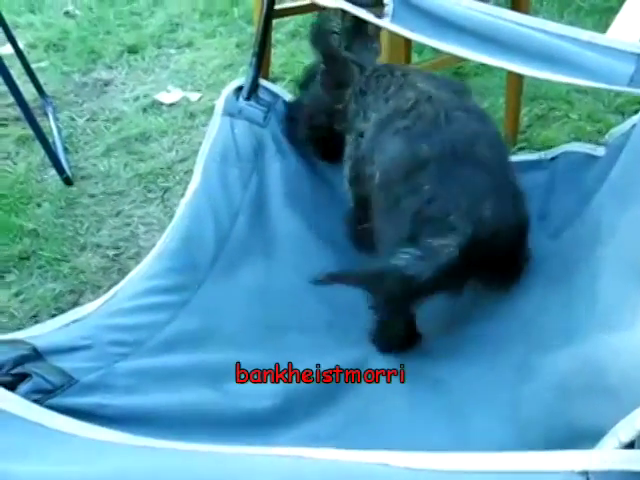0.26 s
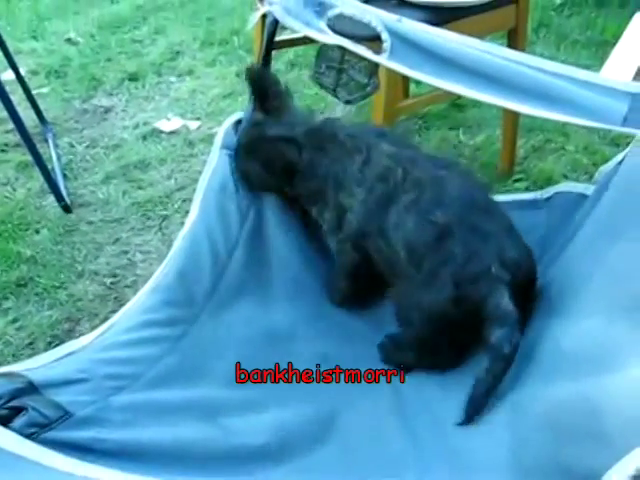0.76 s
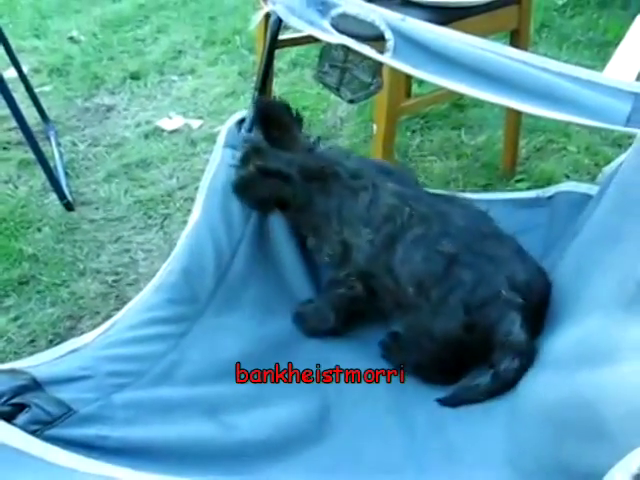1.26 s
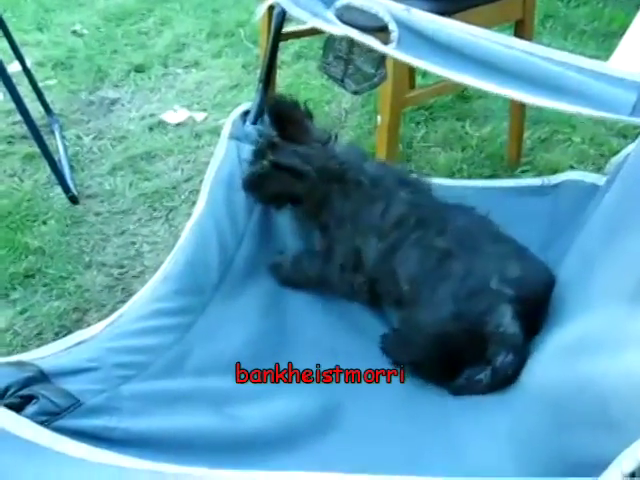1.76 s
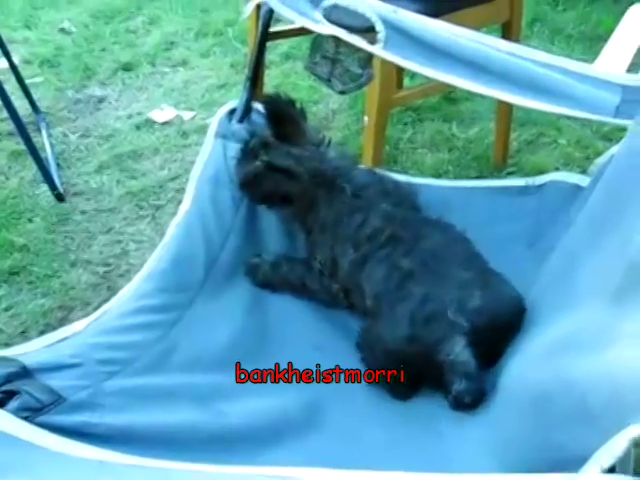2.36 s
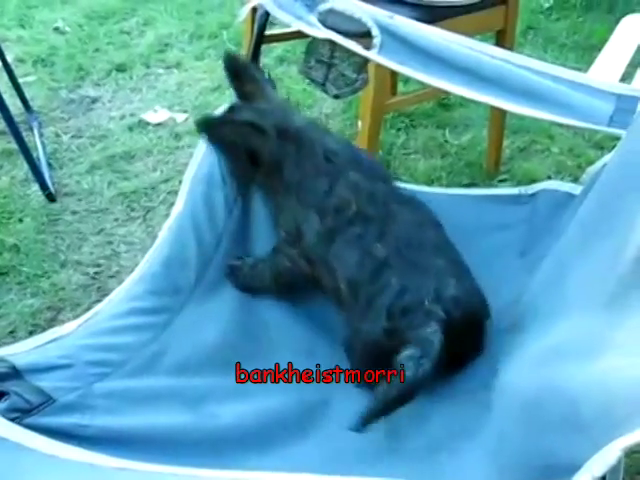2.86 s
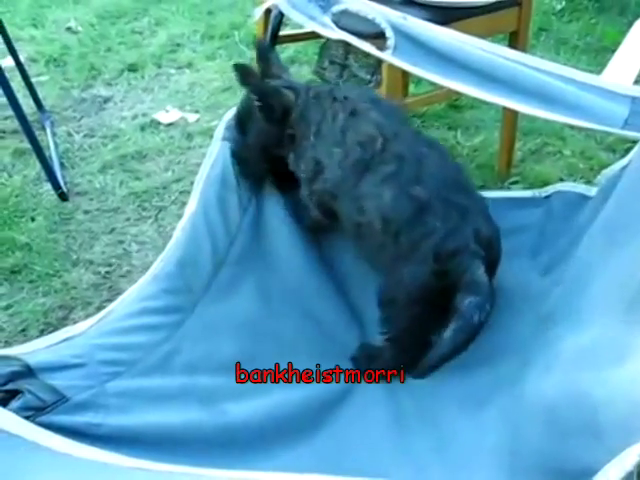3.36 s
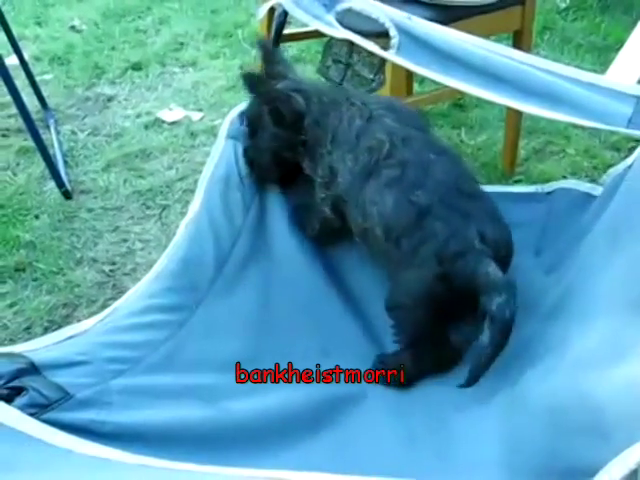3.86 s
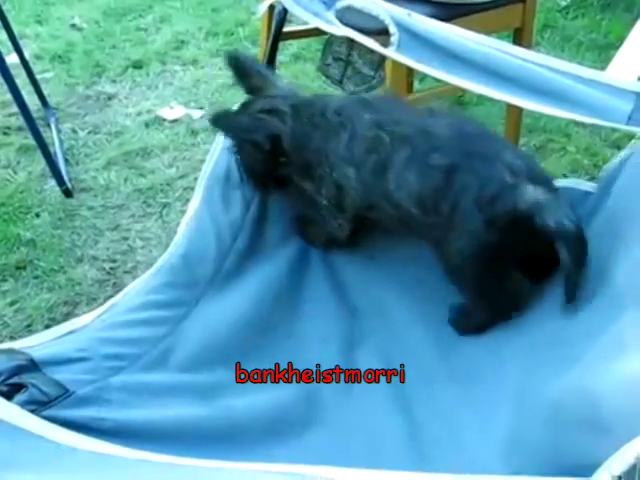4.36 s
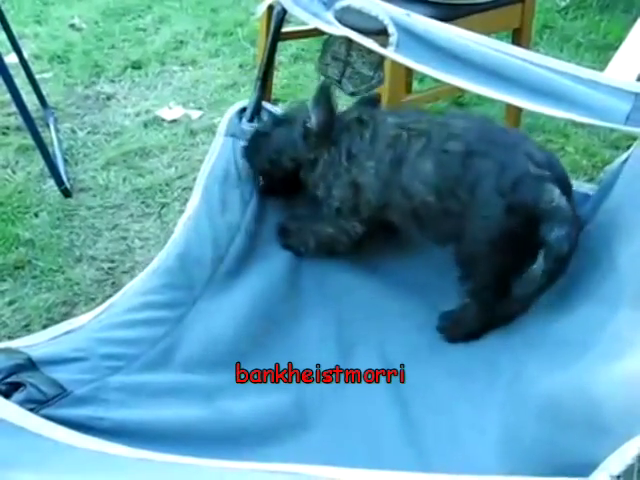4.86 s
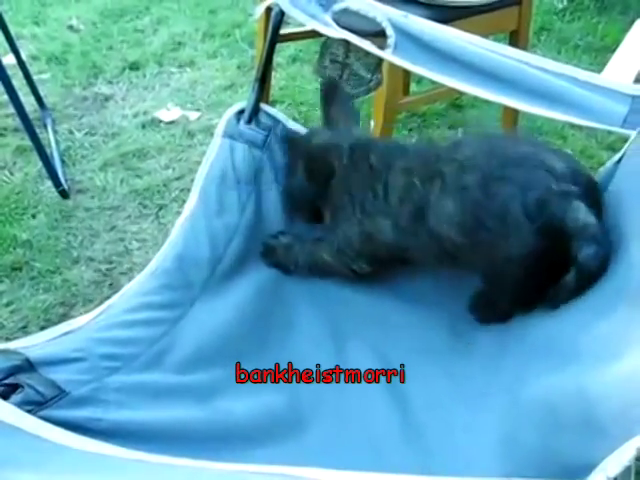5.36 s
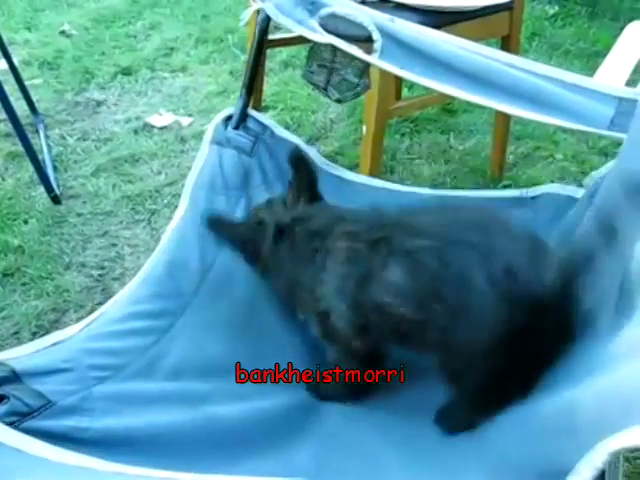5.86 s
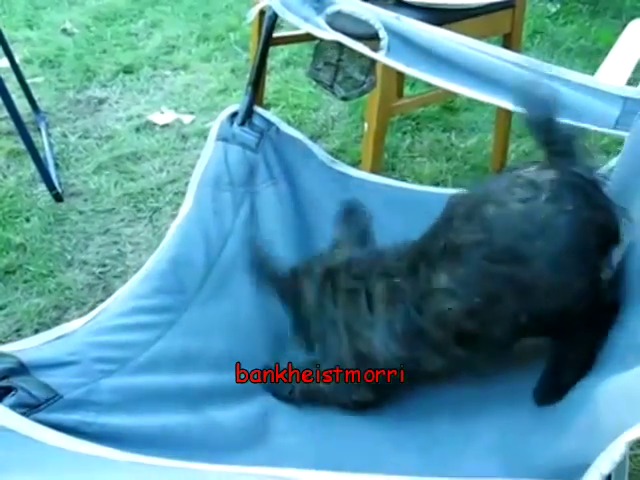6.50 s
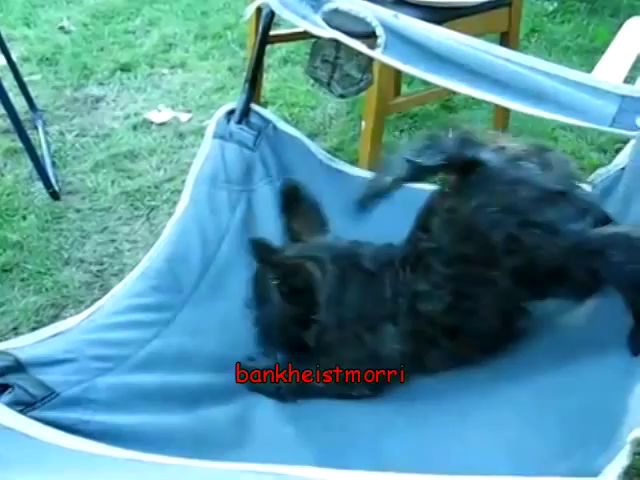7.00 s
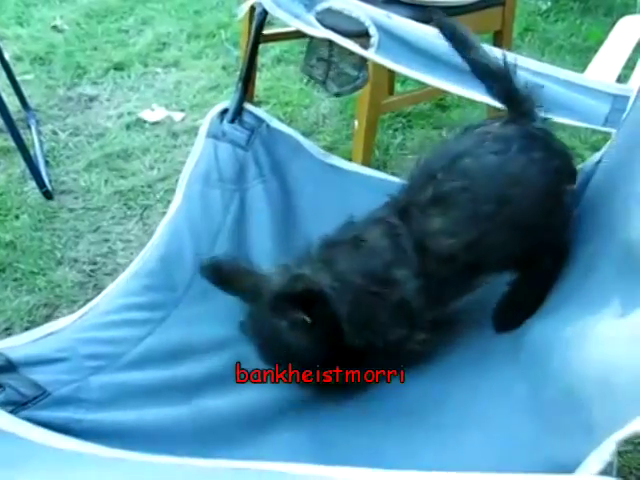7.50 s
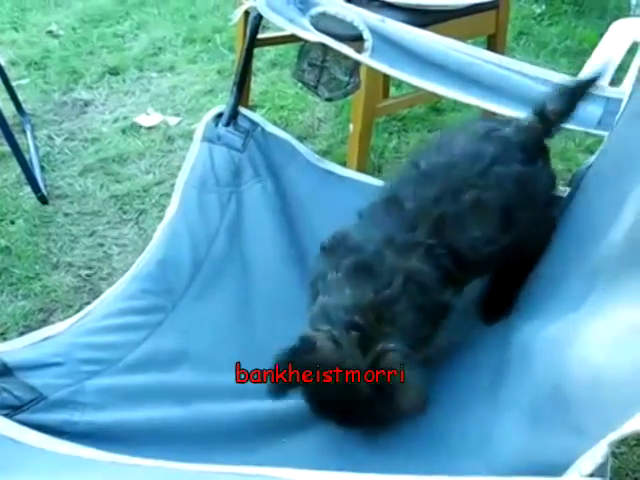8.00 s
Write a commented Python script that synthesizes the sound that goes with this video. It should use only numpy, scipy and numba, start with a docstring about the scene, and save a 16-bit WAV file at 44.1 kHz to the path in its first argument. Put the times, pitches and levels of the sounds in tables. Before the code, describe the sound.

A small dog digs at a taut cloth chair seat, claws scuffing, snagging and plucking in irregular bursts, with short squeaks and brief near-silent gaps.

```python
"""Scuffs, snaps and squeaks, close up: a small dog digs at the cloth seat of a folding chair on a lawn.
Paws drag over the weave in many tiny random slips; claws snag and release as damped plucks; both ring
four seat modes. Claws also skid with a gliding pitch, short squeaks and knocks ring at a steady pitch, fur
hisses as banded noise, hard landings thump the frame, and rumble and an even outdoor hush lie below.
The small camera mutes its input below a threshold and has a dull top, a small offset and hiss."""
import sys
import numpy as np
from scipy import signal
from scipy.io import wavfile
from scipy.ndimage import uniform_filter1d
from numba import njit

SR = 44100
rng = np.random.default_rng(int(sys.argv[2]) if len(sys.argv) > 2 else 0)


def wav_out(sig):
    """Save sig, one row per channel (or a flat mono array), as 16-bit PCM at SR to the path in sys.argv[1]."""
    wavfile.write(sys.argv[1], SR, np.round(np.clip(np.atleast_2d(sig).T, -1, 1) * 32767).astype(np.int16))


N = 363384

# Modes of the stretched seat, widths before scaling: mode_hz, drag_width_hz, free_width_hz
SEAT_MODES = [(298.7, 121, 210), (797.5, 271, 284), (1753, 960, 810), (3260, 1590, 1560)]
# Slips feeding each mode: rate_per_s, scatter_db, flicker_db, pitch_drift_share
MODE_SLIPS = [(505.7, 3.0, 0, 0.11), (1199, 3.5, 1.5, 0.045), (3520, 2, 2.5, 0.18), (11400, 3.5, 1, 0.11)]
# Share of a hard catch reaching each seat mode: share [ratio]
CATCH_SHARE_PER_MODE = [.45, 0.59, 0.72, 0.42]
# How readily each seat mode speaks under a paw: level_db
PAW_MODE_DB = [0.0099, 0.25, -1.23, -0.045]
# How readily each seat mode speaks in a snag or tick: level_db
SNAG_TICK_MODE_DB = [0.99, 2.5, 2.4, 3.44]
# Paw strokes over the weave: peak_s, swell_s, fade_s, level_db,
# strongest_oct (octaves above the lowest mode), falloff_db_per_oct
PAW_STROKES = [(.047, 0.027, 0.033, -38.5, 5, 2.5), (.142, 0.034, 0.043, -31, 1.5, 2.5),
               (.205, 0.021, 0.033, -37, 2, 1), (.352, 0.062, 0.053, -27, 1.5, 5.5),
               (.435, .02, 0.026, -37.5, 0, 2), (.534, 0.04, 0.15, -27, 1.1, 7),
               (.62, 0.066, 0.046, -36, 2, 3.5), (.726, 0.15, 0.012, -27.5, 1.1, 2.5),
               (.828, 0.029, 0.032, -29.5, 0.5, 4.5), (.945, 0.068, 0.037, -25, 1.1, 5),
               (1.028, 0.04, 0.036, -30, 0, 4), (1.229, 0.01, 0.011, -34.5, 2, 3.5),
               (1.267, 0.018, 0.033, -30, 1.5, 6), (1.364, 0.025, 0.044, -39.5, 1.5, 3.5),
               (2.966, 0.044, 0.12, -29, .5, 4.5), (3.094, 0.025, 0.015, -26.5, 1.3, 9),
               (3.141, 0.0065, 0.035, -25.5, 1.55, 5.5), (3.235, .03, 0.037, -30, 1.6, 6),
               (3.277, 0.015, 0.045, -22.5, 1.2, 6.5), (3.745, 0.024, 0.04, -32, 1.2, 7),
               (3.89, 0.065, 0.031, -36, 2, 2.5), (4.211, 0.017, 0.016, -37.5, 1, 4),
               (4.233, .015, 0.011, -31, 1.4, 11), (4.28, 0.011, 0.012, -36, 0.4, 6),
               (4.33, 0.016, 0.023, -37, 4, 0.5), (4.572, 0.061, 0.025, -30, 1.9, 6),
               (4.697, 0.14, 0.18, -39.5, 2.2, 2), (4.901, 0.03, 0.052, -35, 0.5, 1.5),
               (5.103, 0.14, 0.028, -38.5, -4, 0), (5.305, .012, .02, -53, 1.5, 2.5),
               (5.624, 0.042, 0.039, -28.5, 0.75, 4.5), (5.705, 0.031, .04, -26.5, 0.4, 4.5),
               (5.747, 0.037, 0.041, -25, .5, 7), (5.862, 0.045, 0.065, -23.5, 1.5, 4.5),
               (5.93, .05, 0.04, -32.5, 2, 2), (6.089, 0.12, 0.026, -27, 1, 4.5),
               (6.32, 0.2, 0.03, -33, -1.5, 1), (6.465, 0.076, 0.34, -36.5, 5, 1),
               (6.605, 0.035, .05, -30, 0, 5), (6.69, 0.031, 0.033, -31.5, 2, 0.5),
               (6.734, 0.1, 0.11, -27, 0.34, 3.5), (7.11, 0.043, 0.019, -38, -0.5, 7),
               (7.256, 0.018, 0.032, -33, -1, 5.5), (7.346, 0.055, 0.05, -31.5, -1, 2),
               (7.499, 0.051, 0.033, -25.5, 1.5, 3.5), (7.935, .015, 0.064, -26.5, 2, 3),
               (7.99, 0.16, 0.049, -27.5, 1.5, 4), (8.093, 0.064, 0.023, -28.5, 2, 1.5),
               (8.22, 0.039, 0.082, -24.5, 2, 6)]
# Steady cloth rustle whose level dips after some hard thumps, interpolated: time_s, level_db,
# strongest_oct (octaves above the lowest mode), falloff_db_per_oct
CLOTH_RUSTLE = [(0, -44, 1.4, -0.5), (.75, -39, 0.64, 3), (1.15, -44, 1.1, 3.5), (1.43, -49.5, 1.3, 3.5),
                (1.69, -43, 1.1, 2), (1.9, -44.5, 2.1, 1.5), (2.19, -47, 1.6, 3), (2.305, -58, 4, 1),
                (2.58, -48, 2.2, 0), (2.9, -40.5, 1, 3), (3.37, -37.5, 1.6, 3.5), (3.46, -52, 1.2, 1.5),
                (3.66, -45, 1.4, 3.5), (3.72, -49.5, 1.4, 2.5), (4.0, -45, 1.4, 2), (4.47, -51, 2.9, 2.5),
                (4.6, -44, 1.8, 1), (4.96, -56, 1, -1), (5.11, -46, 1.4, 1), (5.175, -66, 3, 3.5),
                (5.283, -70, 3, 0), (5.3, -57.5, 1.6, 5.5), (5.42, -53.5, 2.7, 1), (5.54, -46.5, 1.1, 2.5),
                (6.13, -44, 0.25, 2), (6.36, -46.5, 1.1, -1.5), (6.88, -46, 1, 2), (7.2, -39.5, 1.3, -1.5),
                (7.42, -47, .3, 0), (7.56, -50.5, .3, 0.5), (7.7, -42, 0.23, 4), (8.14, -43.5, 2.4, 3.5)]
# Low rumble against the lowest seat mode, interpolated: time_s, level_db
RUMBLE_LEVEL = [(0, -8.5), (2, -7), (3, -12.5), (5.7, -9.5), (6.7, -4), (7.4, -5.5), (8.1, -15)]
# Snags of claws, and faint ticks as the muted input briefly opens: start_s, level_db,
# strongest_oct (octaves above the lowest mode), falloff_db_per_oct
SNAGS_AND_TICKS = [(0.0247, -17, -1, 9.5), (.042, -25, 0, 5), (.053, -25.5, 1.2, 5), (.112, -27.5, 2, 5),
                   (0.1723, -23, 0.3, 5), (0.271, -20.5, 2, 7), (0.287, -22, 3, 1.5),
                   (0.313, -15.5, 0.4, 9), (0.3237, -20, 2.5, 10), (0.4279, -19.5, 2, 4.5),
                   (0.609, -22, 1.5, 7), (0.637, -22, 2.5, 8), (0.678, -18, 3, 6), (0.7007, -15, 4, 4.5),
                   (0.8102, -15, 2.5, 7.5), (0.8163, -11, 0.8, 14), (0.8396, -19.5, 2, 7.5),
                   (0.8766, -15.5, 0.6, 9), (0.905, -19.5, 0.2, 12), (0.9698, -17.5, 0.5, 5),
                   (1.098, -13.5, 1.0, 16), (1.15, -12.5, 1.7, 5), (1.189, -30, 2.5, 4), (1.27, -7, 3.2, 4),
                   (1.3213, -22, 1.2, 11), (1.5663, -22.5, -0.2, 2.5), (1.808, -28, 0.7, 11),
                   (1.961, -16, 0.9, 11.5), (1.988, -20, 2, 6), (2.007, -15, 1.4, 9),
                   (2.0102, -17, 2.6, 10), (2.0425, -10.5, 2.5, 12.5), (2.092, -14.5, 3.5, 3),
                   (2.1182, -22, 2.4, 10), (2.16, -15.5, 2, 13), (2.188, -11.5, 2.5, 6.5),
                   (2.2303, -26, 1.5, 2), (2.832, -19, 1.3, 2.5), (2.8606, -15, 1.26, 7),
                   (2.9464, -9, 2.5, 11), (2.992, -10, 0.8, 11), (3.034, -24.5, 3, 5),
                   (3.198, -13, 2.5, 10), (3.2443, -21, 1.5, 8), (3.2742, -11.5, 2.5, 6.5),
                   (3.3234, -18, 2, 9), (3.3945, -9.5, 1.4, 11.5), (3.514, -9.5, 3.5, 5),
                   (3.6693, -21, 3.5, 2), (3.715, -23.5, 6, -1), (3.774, -17.5, 1, 11),
                   (3.899, -16.5, 4, 2), (3.922, -18, 1.2, 7), (3.9431, -12.5, 3, 4), (4.0, -5.5, 0.8, 13),
                   (4.019, -19, 0.4, 7), (4.116, -16, 2, 3), (4.204, -25.5, 2.5, 5), (4.612, -21, 3, 7),
                   (4.66, -27.5, 2, 0), (4.777, -26, 0.7, 0), (4.866, -20, 0.15, 10.5),
                   (4.9921, -24.5, 1.5, 3), (5.1148, -11.5, 3.5, 8), (5.1282, -21, 2, 1),
                   (5.168, -49.5, 4, 1), (5.174, -49.5, 3, 1.5), (5.202, -40, 4, 4), (5.226, -48, 2.5, 2),
                   (5.234, -38.5, 3.5, 4.5), (5.272, -51, 2.5, 1), (5.2864, -33, 2.5, 3),
                   (5.3171, -28.5, 0.5, 4.5), (5.361, -36, 1.5, 6), (5.469, -30.5, 0.8, 8),
                   (5.7098, -19, 2, 4.5), (5.786, -11.5, 0.76, 12), (6.04, -20.5, 2.5, 1.5),
                   (6.065, -18, 0.3, 9), (6.1542, -7.5, 0.23, 19), (6.2095, -15, 0.34, 8.5),
                   (6.281, -24, 1, -1), (6.4191, -20, 0, 4), (6.5252, -16.5, -0.4, 8),
                   (6.545, -22, 0.5, 13), (6.559, -22, 0, 12), (6.7339, -18.5, 3, -1),
                   (7.4664, -16.5, 2, 2), (7.6508, -12, 0, 13), (7.667, -20, 0.5, 10),
                   (7.682, -18, 0.4, 15), (7.7073, -17, 0.7, 9), (7.937, -17, 1.5, 6), (8.065, -15, 4.5, 5),
                   (8.075, -16, 3, 5.5), (8.187, -23.5, 1.5, 2)]
# Claws skidding along the threads: start_s, length_s, start_hz, end_hz, width_hz (before scaling), level_db
CLAW_SKIDS = [(0.928, 0.037, 764, 777, 150, -20), (3.856, 0.042, 1406, 2000, 350, -30),
              (5.689, 0.05, 1880, 1490, 300, -36.5), (5.732, 0.044, 1810, 1210, 300, -35.5),
              (6.579, 0.058, 330, 230, 80, -27), (6.74, 0.045, 724, 580, 200, -26.5),
              (7.493, 0.063, 999, 482, 150, -24.5), (7.464, 0.032, 872, 1410, 250, -21),
              (7.47, 0.05, 1434, 2260, 700, -21.5), (7.742, 0.04, 1490, 1680, 150, -36),
              (7.84, 0.12, 450, 350, 90, -28), (7.93, 0.086, 494, 1108, 140, -24),
              (8.02, 0.061, 902, 700, 120, -31), (7.959, 0.06, 1560, 2330, 320, -25.5),
              (7.971, 0.044, 2690, 3480, 280, -28.5), (8.065, 0.045, 2010, 3020, 497, -23.5),
              (8.066, 0.042, 688, 1940, 200, -28.5), (8.085, 0.029, 3260, 4170, 400, -25.5),
              (8.19, 0.054, 794, 1560, 200, -22.5), (8.199, 0.04, 2600, 3610, 500, -28)]
# Short ringing squeaks and knocks at a steady pitch, perhaps from the chair frame:
# start_s, length_s (fade scale), pitch_hz, level_db
SQUEAKS_AND_KNOCKS = [(0.854, .011, 1560, -26), (0.923, .01, 1570, -24), (.934, .008, 1580, -23),
                      (0.954, .014, 1520, -28), (1.023, .03, 1580, -28), (1.074, .016, 1550, -28.5),
                      (1.221, .024, 1550, -24), (1.255, 0.011, 1590, -30), (1.355, 0.015, 1570, -25.5),
                      (1.387, .01, 1600, -35), (2.008, .008, 1670, -19), (2.042, .005, 1950, -16),
                      (2.159, .006, 1680, -16), (2.186, .007, 1670, -12), (6.063, .0035, 2240, -14),
                      (6.075, .003, 2400, -24), (6.083, .003, 2400, -25)]
# Fur brushing the cloth: peak_s, swell_s, fade_s, level_db
FUR_BRUSH = [(.68, .08, 0.064, -41), (.995, .05, .12, -36), (1.65, 0.22, 0.14, -49.5),
             (1.83, .2, 0.098, -50), (3.04, 0.041, .06, -46.5), (7.18, 0.065, 0.037, -39.5),
             (7.232, 0.011, 0.018, -30.5), (7.29, 0.025, 0.047, -30), (7.35, .04, 0.026, -34.5),
             (7.93, 0.11, 0.091, -36)]
# Paws landing hard rock the frame: start_s, level_db
FRAME_THUMPS = [(1.029, -40), (1.269, -35), (2.188, -28), (3.393, -28), (5.119, -28), (6.149, -30),
                (6.738, -25), (7.47, -37)]

STROKE_SPAN_DB = 12  # gained over a swell, lost over a fade
CLEAN_RING_DB = 12.5  # a snag with this fall-off per octave rings twice as long as one with none
SQUEAK_WIDTH_HZ, SQUEAK_ATTACK_S = 220, .0016
BRUSH_HZ, BRUSH_WIDTH_HZ = 3950, 2100
RUMBLE_HZ, RUMBLE_FLOOR_DB = 126, -66.0
AIR_DB = -59.5
GATE_DB, GATE_HOLD_S = -55, 0.0021
MIC_HZ, TOP_HZ = 6010, 15600
OFFSET, HISS_DB = -.0011, -86  # offset as a share of full scale


def undb(db):
    """Decibels to amplitude."""
    return 10 ** (np.asarray(db) / 20)


def unit(x):
    """Scale to an RMS of 1."""
    return x / np.sqrt(np.mean(x ** 2))


@njit
def svf(x, hz, width):
    """State-variable band-pass with a moving centre, gain 1 there."""
    y, band, low = np.empty(len(x)), 0., 0.
    for i in range(len(x)):
        g, damping = np.tan(np.pi * hz[i] / SR), width / hz[i]
        v = (band + g * (x[i] - low)) / (1 + g * (g + damping))
        band, low, y[i] = 2 * v - band, low + 2 * g * v, damping * v
    return y


def band_twice(x, hz, width_1_hz, width_2_hz):
    """Two band-passes in series on one moving centre, for steeper skirts."""
    return svf(svf(x, hz, width_1_hz), hz, width_2_hz)


def walk(rate):
    """Random levels held 1 / rate s and slewed twice; spread near 1."""
    hold = int(SR / rate)
    steps = np.repeat(rng.standard_normal(N // hold + 1), hold)
    return 1.21 * uniform_filter1d(uniform_filter1d(steps, hold), hold)[:N]


def slips(rate_per_s, scatter_db):
    """Threads let go at random moments; a few let go hard, up to what the weave can hold."""
    happens = rng.random(N) < rate_per_s / SR
    hardness = np.minimum(rng.exponential(size=N), 3)
    return happens * undb(scatter_db * hardness) * np.sign(rng.random(N) - .5)


def colour(level_db, strongest_oct, falloff_db, mode_db):
    """Level in each seat mode, falling off in dB per octave either side of the strongest pitch."""
    hz = np.array(SEAT_MODES)[:, :1]
    octaves = np.log2(hz / SEAT_MODES[0][0])
    return level_db - np.abs(falloff_db) * np.abs(octaves - strongest_oct) + np.array(mode_db)[:, None]


def stroke_distance(t, peak_s, swell_s, fade_s):
    """Time from the peak, counted in swells before it and fades after it."""
    return np.where(t < peak_s, (peak_s - t) / swell_s, (t - peak_s) / fade_s)


def paw_levels():
    """dB in each mode over time: swelling and fading strokes add their power to the rustle."""
    t = np.arange(0, N, 32) / SR
    time_s, *controls = np.transpose(CLOTH_RUSTLE)
    rustle = [np.interp(t, time_s, c) for c in controls]
    power = undb(colour(*rustle, PAW_MODE_DB)) ** 2
    for peak_s, swell_s, fade_s, *stroke in PAW_STROKES:
        drop_db = STROKE_SPAN_DB * stroke_distance(t, peak_s, swell_s, fade_s) ** 1.22
        power = power + undb(colour(*stroke, PAW_MODE_DB) - drop_db) ** 2
    return [np.interp(np.arange(N) / SR, t, 10 * np.log10(p)) for p in power]


def rumble(lowest_mode_db):
    """Shifting body weight and the breeze: wavering noise low-down that follows the lowest mode, over a floor."""
    centre = np.full(N, 1. * RUMBLE_HZ)
    low = unit(band_twice(rng.standard_normal(N), centre, 140.0, 280.0)) * undb(4.1 * walk(10))
    relative_db = np.interp(np.arange(N) / SR, *np.transpose(RUMBLE_LEVEL))
    return low * (undb(relative_db + lowest_mode_db) + undb(RUMBLE_FLOOR_DB))


def drag():
    """Slips ring every mode; grip comes and goes for all modes together; tension bends the modes."""
    levels_db = paw_levels()
    # many times a second a thread catches and jolts all modes at once
    catches = unit(slips(220, 3.4))
    out = 0
    for mode, feed, share, level_db in zip(SEAT_MODES, MODE_SLIPS, CATCH_SHARE_PER_MODE, levels_db):
        hz, width_hz, _ = mode
        rate, scatter_db, flicker_db, drift = feed
        centre = hz * np.exp(drift * walk(14))
        grit = unit(slips(rate, scatter_db)) + share * catches + 1e-18
        ring = band_twice(grit, centre, 1.71 * width_hz, 2.17 * width_hz)
        out = out + unit(ring) * undb(level_db + flicker_db * walk(30))
    out = out + rumble(levels_db[0])
    grip_db = 1.67 * walk(70) + 0.69 * walk(20)
    return out * undb(grip_db)


def snags():
    """Each snag or tick and its weaker inverted rebound ring the modes, detuned at random; a rustle dies after it."""
    out, t = np.zeros(N + 2000), np.arange(1500) / SR
    shaken = [unit(svf(rng.standard_normal(N + 2000), np.full(N + 2000, 1. * hz), 1. * width_hz))
              for hz, width_hz, _ in SEAT_MODES]
    for (start_s, *snag), chance in zip(SNAGS_AND_TICKS, rng.random((len(SNAGS_AND_TICKS), 10))):
        levels = undb(colour(*snag, SNAG_TICK_MODE_DB)[:, 0])
        i, lag = int(start_s * SR), int(SR * (.001 + .002 * chance[8]))
        cleanness = 1 + abs(snag[2]) / CLEAN_RING_DB
        for k, (hz, _, width_hz) in enumerate(SEAT_MODES):
            # most modes start flipped in sign
            cycles = hz * (1 + 0.15 * (chance[k] - .5)) * t + .5 * (chance[4 + k] > .3)
            attack = (1 - np.exp(-t * hz * 2.33)) ** 2
            swell = attack * np.exp(-np.pi * width_hz * 1.6 / cleanness * t)
            ring = levels[k] * swell / swell.max() * np.sin(2 * np.pi * cycles)
            # the treble of the rustle dies first
            decay = np.exp(-t * (hz / 1000) ** 0.77 / 0.0051)
            settle = undb(-15.5) * (1 - np.exp(-t / 0.00075)) * decay
            out[i:i + len(t)] += ring + levels[k] * settle * shaken[k][i:i + len(t)]
            out[i + lag:i + lag + len(t)] -= 0.27 * ring
    return out[:N]


def skids():
    """Thread after thread slips under the claw, so the sound has a pitch that follows the claw's speed."""
    out, threads = np.zeros(N + SR), rng.standard_normal(N + SR)
    for start_s, length_s, start_hz, end_hz, width_hz, level_db in CLAW_SKIDS:
        i, n = int(start_s * SR), int(length_s * SR)
        pitch = np.geomspace(start_hz, end_hz, n)
        phase = 2 * np.pi * np.cumsum(pitch) / SR
        beat = np.sin(phase) + .6 * np.sin(2 * phase)
        rasp = unit(band_twice(threads[i:i + n], pitch, 1. * width_hz, 2. * width_hz))
        # the more the claw speeds up, the later it digs in hardest
        progress = np.linspace(0, 1, n) ** (0.69 * end_hz / start_hz)
        pressure = np.sin(np.pi * progress) ** 0.76
        out[i:i + n] += undb(level_db) * pressure * (rasp + 0.36 * beat)
    return out[:N]


def squeaks():
    """A quick onset, then a slightly rough ring at a steady pitch that dies away."""
    out, noise = np.zeros(N + SR), rng.standard_normal(N + SR)
    for start_s, length_s, hz, level_db in SQUEAKS_AND_KNOCKS:
        i, t = int(start_s * SR), np.arange(int(2 * length_s * SR)) / SR
        rough = unit(svf(noise[i:i + len(t)], np.full(len(t), 1. * hz), 1. * SQUEAK_WIDTH_HZ))
        shape = (1 - np.exp(-t / SQUEAK_ATTACK_S)) * np.exp(-1.6 * (t / length_s) ** 2)
        tone = np.sin(2 * np.pi * hz * t)
        out[i:i + len(t)] += undb(level_db) * shape * (.55 * rough + .85 * tone)
    return out[:N]


def brush():
    """Countless hairs slide over the weave: fine noise in a broad band that drifts a little."""
    t = np.arange(N) / SR
    centre = BRUSH_HZ * np.exp(.05 * walk(5.4))
    hairs = unit(band_twice(rng.standard_normal(N), centre, 1. * BRUSH_WIDTH_HZ, 2. * BRUSH_WIDTH_HZ))
    gain = 0
    for peak_s, swell_s, fade_s, level_db in FUR_BRUSH:
        drop_db = STROKE_SPAN_DB * stroke_distance(t, peak_s, swell_s, fade_s) ** 2
        gain = gain + undb(level_db - drop_db)
    return hairs * gain * undb(2.1 * walk(40))


def thumps():
    """One damped 55 Hz swing of the frame for each landing."""
    out, t = np.zeros(N + 4000), np.arange(4000) / SR
    swing = np.exp(-t / 0.0078) * np.sin(2 * np.pi * 55 * t)
    for start_s, level_db in FRAME_THUMPS:
        i = int(start_s * SR)
        out[i:i + len(t)] += undb(level_db) * swing
    return out[:N]


def air():
    """Distant outdoor hush: even noise in a broad band around 2 kHz."""
    return undb(AIR_DB) * unit(svf(rng.standard_normal(N), np.full(N, 2000.0), 3500.0))


def scene():
    """Sum of all sources, one channel."""
    return (drag() + brush() + snags() + skids() + squeaks() + thumps() + air())[None]


def record(dry):
    """Input rounds peaks, adds an offset and mutes while the recent level is low; top rolls off; hiss is added."""
    recent = uniform_filter1d(np.abs(dry), int(GATE_HOLD_S * SR))
    gate = uniform_filter1d(1. * (recent > undb(GATE_DB)), size=24)
    rounded = np.tanh(0.81 * dry) / 0.79
    gated = (rounded + OFFSET) * gate
    steep = signal.cheby2(8, 48, 1.302 * MIC_HZ, fs=SR, output="sos")
    gentle = signal.butter(4, MIC_HZ, fs=SR, output="sos")
    dull = signal.sosfilt(gentle, signal.sosfilt(steep, gated))
    hiss = undb(HISS_DB) * rng.standard_normal(dry.shape)
    return signal.sosfilt(signal.ellip(8, .2, 40, TOP_HZ, fs=SR, output="sos"), dull + hiss)


dry = scene()
out = record(dry)
wav_out(out)
```